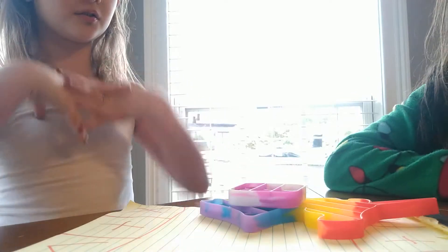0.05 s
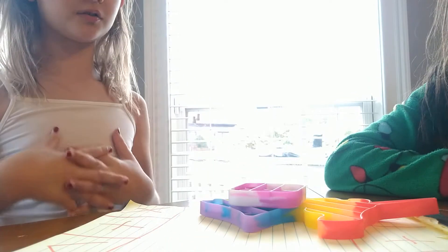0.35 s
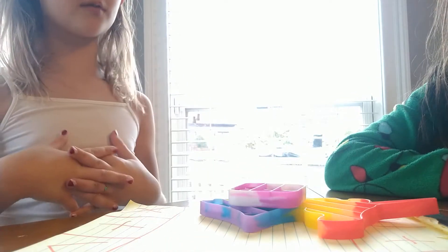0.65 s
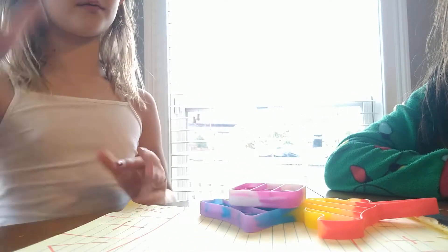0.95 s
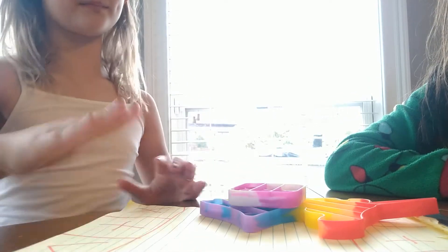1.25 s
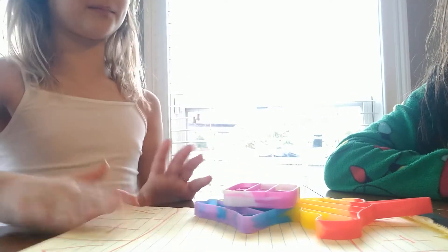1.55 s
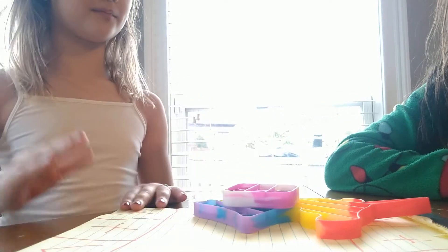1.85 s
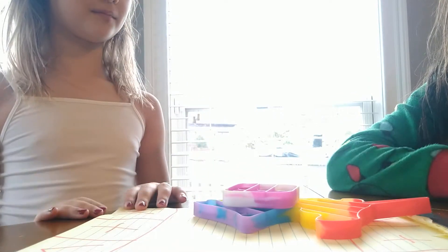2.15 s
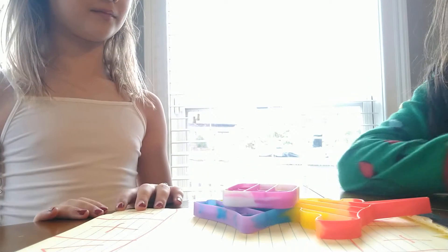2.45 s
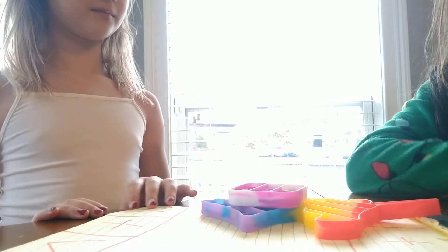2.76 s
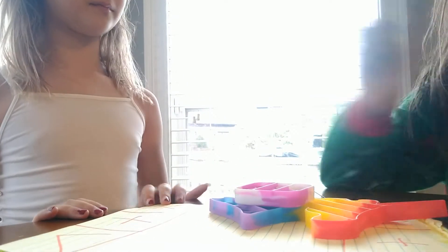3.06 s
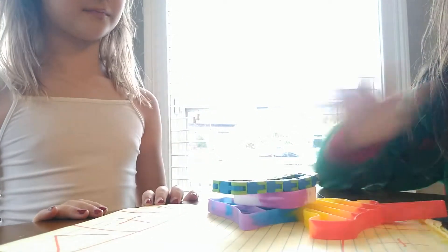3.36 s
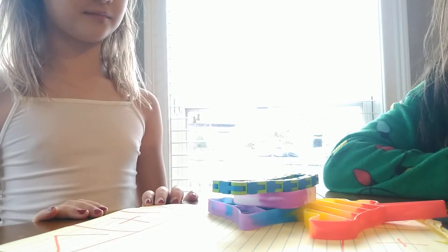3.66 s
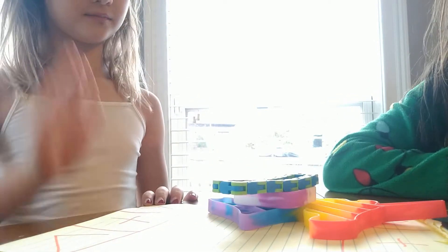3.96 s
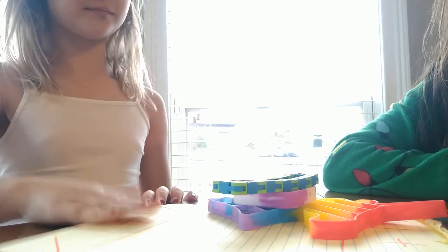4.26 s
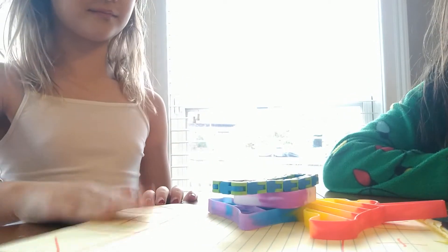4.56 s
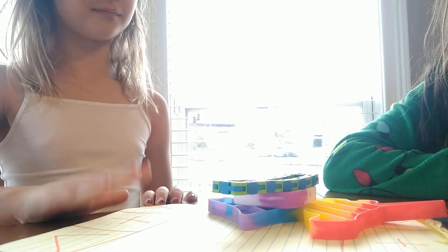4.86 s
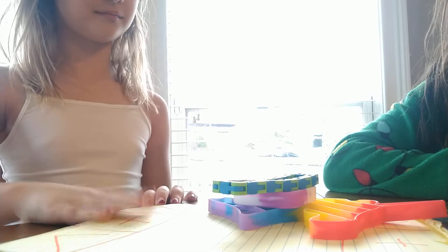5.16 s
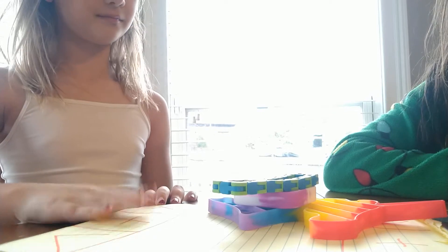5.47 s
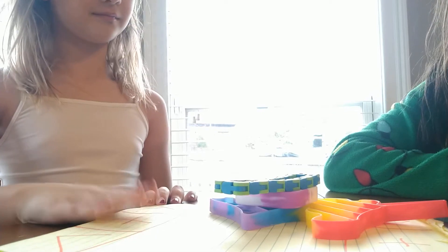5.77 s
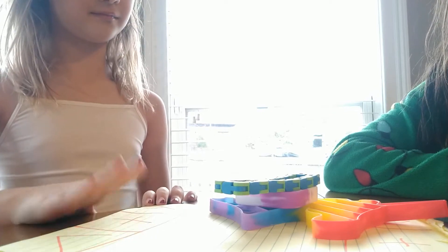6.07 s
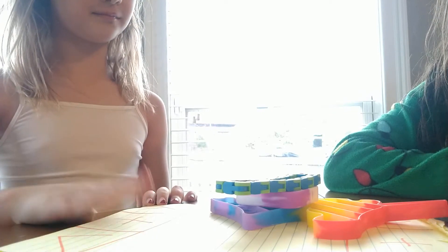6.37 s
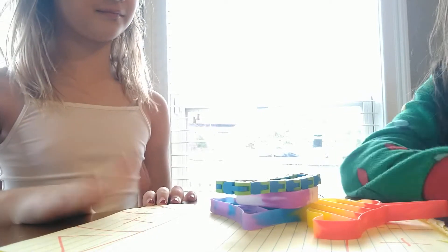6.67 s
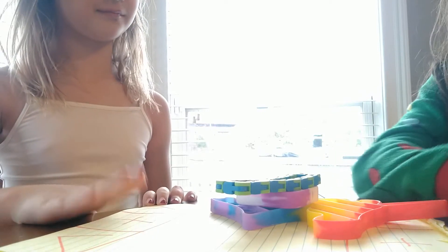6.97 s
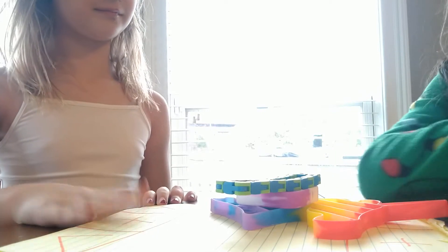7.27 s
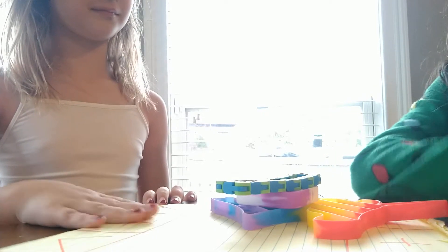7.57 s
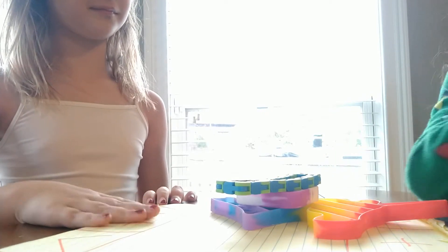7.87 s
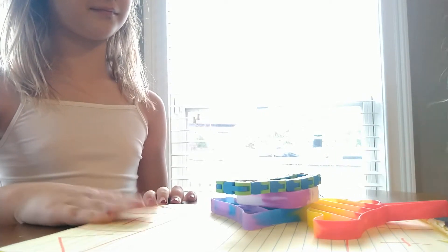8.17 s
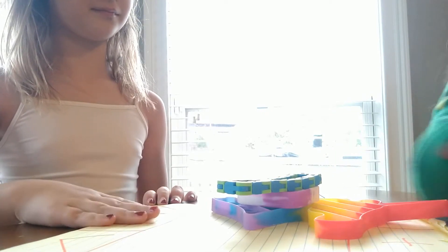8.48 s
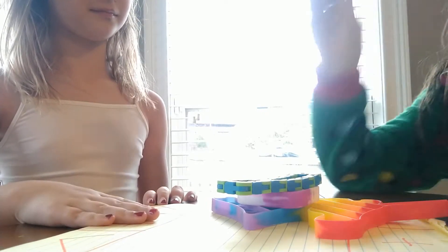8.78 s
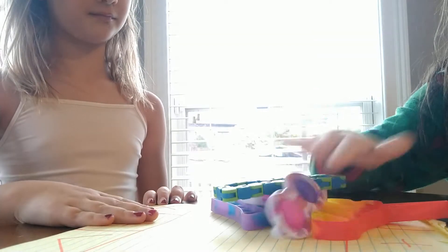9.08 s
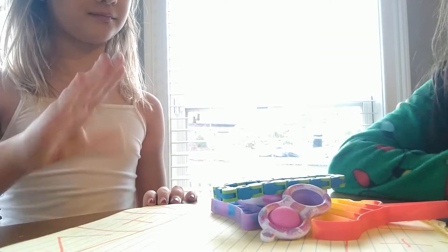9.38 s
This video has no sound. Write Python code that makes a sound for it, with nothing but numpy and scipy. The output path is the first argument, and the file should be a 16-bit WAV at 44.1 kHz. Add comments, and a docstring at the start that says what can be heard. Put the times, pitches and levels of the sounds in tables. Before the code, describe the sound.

In a bare room, a hand slaps a paper pad on a wooden table a few times and gives one hollow clap. Soft arm bumps, faint finger squeaks and toy clicks follow. Another firm slap leads into very light, steady fingertip pats. Then a forearm knocks and skids on the wood, a sleeve rustles, a plastic toy clatters down and a last slap lands. The microphone is close, with a faint appliance hum behind.

```python
"""A hand slaps and taps a paper pad on a wooden table in a bare room, and once claps, cupped, on skin.
Opposite, a second person's forearm bumps and drags, a sleeve rustles, fingers squeak, and silicone
and plastic fidget toys click, scrape and rustle. Impacts are brief force pulses and rubbing is
stick-slip noise; both excite the modes of the table and the reverberation of the room.
An appliance hums. A two-port microphone stands close by on the table."""
import sys
import numpy as np
from scipy import signal
from scipy.fft import rfft, irfft, next_fast_len
from scipy.io import wavfile

SR = 44100
rng = np.random.default_rng(int(sys.argv[2]) if len(sys.argv) > 2 else 0)


def bounce(signal):
    """Save signal as a 16-bit WAV file at the path given by the first command-line argument."""
    frames = np.transpose(np.atleast_2d(signal))
    limited = np.clip(frames, -1, 1)
    pcm = np.round(limited * 32767).astype(np.int16)
    wavfile.write(sys.argv[1], SR, pcm)


N = 424241
TIME = np.arange(N) / SR
TAIL = TIME[:SR * 2 // 3]

# Levels are relative within each table; pan is left minus right.
# appliance hum: t/s, level/dB
HUM_LEVELS = [(0, -71.5), (1.2, -69.5), (2.2, -67.5), (3.8, -69.5), (4.9, -71), (5.8, -71.5), (6.7, -66.5),
              (9.62, -68)]
# spectra of the air and of the low rumble: f/Hz, level/dB
AIR_SPECTRUM = [(100, -41.5), (170, -17.5), (243, -2.5), (329, -14.5), (405, -5.5), (538, -19),
                (614, -8), (770, -19.5), (1230, -20.5), (1440, -24.5), (15500, -33.5)]
RUMBLE_SPECTRUM = [(25, -22.5), (70, -14), (100, -4), (125, 1), (160, -8.5), (220, -13), (400, -41),
                   (2000, -79.5)]
# reverberation time: f/Hz, T60/s
ROOM_DECAY = [(100, .5), (300, 0.46), (800, .5), (2000, 0.4357), (5000, 0.49), (9000, 0.45), (15000, 0.13)]
# reverberant gain: f/Hz, level/dB
ROOM_GAIN = [(100, 0.5), (300, 2), (800, -2.5), (2000, -2), (5000, -9), (9000, -5), (15000, -3.5)]
# modes of the table top: f/Hz, level/dB, T60/s
TABLE_MODES = [(122.5, 2, 0.64), (162, -9.5, 0.24), (230, -4, 0.42), (302, 3, 0.24), (326.7, 1.5, 0.26),
               (473.5, -0.5, 0.35), (602, -1, .25), (665.5, 3, .25), (714, -2.5, 0.51), (839, -3.5, 0.13),
               (996, -1, 0.23), (1086.4, -1, 0.37), (1700, -4, .18), (1900, -3.5, 0.58), (2364, 2, 0.25),
               (2600, 0, 0.14)]
# unequal response of the ports: f/Hz, pan/dB
PORT_RESPONSE = [(100, -.5), (1000, -0.1), (2200, -2), (4500, -2), (8500, 4.5), (13000, 3), (16000, 1)]

# sleeve strokes: t/s, duration/s, level/dB
SLEEVE_STROKES = [(0, 0.079, -73.5), (1.8, 0.75, -77.5), (2.45, 1.26, -74), (6.69, .2, -72.5),
                  (7.08, 0.15, -66.5), (7.4, 0.53, -71.5), (7.81, 0.093, -68), (7.93, 0.081, -64),
                  (8.35, .45, -63), (8.68, 0.068, -46.5), (8.85, 1.1, -75.5)]
# spectrum of brushed fleece: f/Hz, level/dB
CLOTH_SPECTRUM = [(200, -14), (1700, -4), (3000, 1), (4000, 3), (5500, -6), (6100, 1.5), (6900, -7),
                  (7700, -11.5), (8700, -15), (9400, -8), (10200, -18), (15000, -15)]
# resonances of the rustle: f/Hz, bandwidth/Hz, level/dB
RUSTLE_BANDS = [(2970, 450, 1.5), (6300, 440, 1), (8550, 700, 4.5)]
# finger rubs: t/s, duration/s, level/dB
FINGER_STROKES = [(2.45, 0.14, -57.5), (2.57, .09, -55.5), (2.68, 0.085, -62), (2.79, 0.078, -63.5),
                  (2.95, 0.11, -66)]
# resonances of the squeak: f/Hz, bandwidth/Hz, level/dB
SQUEAK_BANDS = [(735, 81, 1.5), (910, 96, -3), (1120, 99, -4), (2970, 290, -5), (6060, 220, -8)]
# toys shifting in a heap: t/s, duration/s, level/dB
RUMMAGE_STROKES = [(7.1, .42, -68.5), (7.91, 0.095, -64), (8.24, 0.33, -57.5), (8.62, 0.23, -54),
                   (9.15, 0.55, -67.5)]
# spectrum of silicone rubbing on plastic: f/Hz, level/dB
SILICONE_SPECTRUM = [(100, -18.5), (400, -1), (900, 0.5), (1500, -1), (3000, -4.5), (4500, -11),
                     (6300, -12), (8500, -2.5), (10300, -21.5), (15500, -21)]
# forearm skids: t/s, duration/s, level/dB
DRAG_STROKES = [(2.17, 0.15, -61), (7.265, 0.094, -42.5), (7.56, .14, -48.5), (8.03, 0.1, -41.5),
                (8.28, 0.067, -46), (8.41, 0.055, -51), (8.7, 0.11, -44), (9.0, .04, -36)]

# impact registers thud, knock, slap and tick: lower f/Hz, upper f/Hz
REGISTER_BANDS = [(80, 350), (350, 1400), (1400, 5000), (5000, 16000)]
# brief clicks, scrapes and rustles of toys: t/s, level/dB, bass/dB, brightness/dB, room/dB, pan/dB
TOY_CONTACTS = [(3.315, -34, -9.5, -11, 1.5, 3), (3.3238, -33, -4, -13.5, -12, -4.5),
                (3.6291, -43, -7.5, -5, -5, 3.5), (7.213, -68, -12, 13.5, -18, 6.5),
                (8.6135, -68, -4, 26.5, -5, 7), (8.7013, -45.5, -8.5, 3, 2.5, 21),
                (8.7349, -43.5, 1.5, 11.5, -12, 11), (8.767, -45, -17.5, 3.5, -9.5, 6),
                (8.782, -39.5, -19, 3, -9, 7.5), (8.9351, -21.5, -24, -18, -1, 7),
                (9.261, -51.5, -14, 4, -8, 7)]
# a hard toy drops on the heap and bounces: t/s, level/dB, bass/dB, brightness/dB, room/dB
DROP_HITS = [(9.0302, -31.5, -11, 12, 4.5), (9.0435, -28.5, -9.5, 5, -6)]
# spectrum of contacts on plastic: f/Hz, level/dB
PLASTIC_SPECTRUM = [(60, -16), (170, 2), (400, -3), (850, 3), (1100, 0.5), (1450, -10.5), (3000, -5.5),
                    (5000, -13.5), (6300, -8.5), (8500, -5), (10300, -15.5), (14000, -16.5), (16000, -15.5)]
# forearm, elbow and knuckles on the table: t/s, level/dB, bass/dB, brightness/dB
ARM_HITS = [(2.1725, -39, -4, -26.5), (2.268, -43.5, -23, -15.5), (2.3231, -50, -16, -20),
            (2.4939, -39, -14.5, -10.5), (2.7312, -47, -24, -26), (2.8323, -54.5, -13, -20),
            (2.9335, -55, -13, -14.5), (3.0594, -38, -14.5, -20.5), (3.1785, -51.5, -27, -4.5),
            (6.151, -49.5, -1, -49), (6.7267, -51, -16.5, -23.5), (6.76, -47, -15, -22.5),
            (7.0352, -53.5, -20, -23), (7.2437, -48, -14, -32), (7.267, -42.5, -16, -15),
            (7.3054, -21, -15.5, -20), (7.3761, -31, -25, -28), (7.4139, -31.5, -19, -25),
            (7.5800, -40.5, -24, -35), (7.992, -41, -12.5, -34), (8.0263, -20, -22.5, -27.5),
            (8.0519, -25, -9, -30), (8.1136, -32, -18, -44), (8.1628, -27.5, -12, -26),
            (8.1785, -31, -21, -26), (8.1841, -29, -23, -29), (8.2526, -38.5, -18, -7.5),
            (8.2925, -34.5, -3.5, -46), (8.4038, -31.5, -10.5, -31), (9.4495, -38.5, -6.5, -11),
            (9.4544, -29.5, -4, -19)]
# spectrum of the arm on wood: f/Hz, level/dB
ARM_SPECTRUM = [(60, -22), (200, -4.5), (450, -2.5), (750, 5), (1100, 2), (1500, -10.5), (2900, -16),
                (4700, -24), (6200, -25.5), (7300, -31.5), (8600, -27.5), (10500, -47.5), (15500, -50)]
# contacts of the clap: t/s, level/dB, bass/dB, brightness/dB, room/dB
CLAP_HITS = [(1.6672, -28.5, -20, -8.5, -6), (1.672, -31.5, -21.5, 3, 1), (1.693, -30.5, -17, -23, -12)]
# spectrum of a cupped hand on skin: f/Hz, level/dB
CUPPED_SPECTRUM = [(60, -25), (300, -12), (700, -3.5), (970, 7.5), (1200, -7.5), (1700, -5.5), (2600, -2),
                   (4000, -16), (6300, -13.5), (9000, -21.5), (10200, -30), (14500, -32), (16000, -35.5)]
# fingertips patting the pad, about four a second: t/s, level/dB
FINGER_PATS = [(4.654, -59.5), (4.7852, -62), (5.1, -66), (5.304, -67.5), (5.539, -66), (5.763, -58.5),
               (6.022, -68), (6.2425, -58), (6.517, -63), (7.1352, -62.5)]
# palm and nails on the pad: t/s, level/dB, bass/dB, brightness/dB, room/dB
HAND_HITS = [(1.2604, -13.5, -14.5, -12.5, 3), (1.425, -28, -8, -17, -3.5), (1.4294, -18, -7, -13, -2.5),
             (1.5318, -22.5, -9, -16, -2), (4.1982, -13.5, -6, -15.5, 1), (4.3543, -28.5, -4, -16.5, -4),
             (4.5152, -51, 4, 12, -5), (5.1625, -68.5, -3, 16, -5), (6.828, -50.5, 1.5, 8, -5.5),
             (9.6069, -10.5, -17.5, -9.5, -3.5)]
# spectrum of the hand on paper: f/Hz, level/dB
PALM_SPECTRUM = [(60, -11), (120, -3.5), (400, -7), (650, 1), (1050, 1), (1450, -12.5), (2800, -4.5),
                 (4500, -15.5), (6300, -15), (8500, -17.5), (10500, -31), (15500, -33.5)]

CONTACT_MS, FIRM_DB, SOFTER_DB = 1.3, -15, 28  # contact time at FIRM_DB; doubles per SOFTER_DB less
PORT_LAG_MS, SIDE_PAN_DB = .48, 4.5  # the lag between the ports grows with pan, then levels off
LEAD_S = .015  # surfaces start to brush this long before they meet


def undb(db):
    """Amplitude ratio of a level in decibels."""
    return 10 ** (np.asarray(db) / 20)


def unit(x):
    """Normalisation to an rms of 1."""
    return x / np.sqrt(np.mean(x ** 2))


def at(points, hz):
    """Interpolation of (f, value) points on a log-frequency axis."""
    f, value = np.transpose(points)
    return np.interp(np.log(np.maximum(hz, 1)), np.log(f), value)


def band(x, lo, hi, order=3):
    """Causal Butterworth band-pass."""
    sos = signal.butter(order, [lo, min(hi, SR / 2 - 1)], "band", fs=SR, output="sos")
    return signal.sosfilt(sos, x)


def colour(x, points, size=2048):
    """Minimum-phase filter with a given (f, level) response, by folding the cepstrum."""
    cepstrum = irfft(np.log(undb(at(points, np.fft.rfftfreq(size, 1 / SR)))))
    cepstrum[1:size // 2] *= 2
    cepstrum[size // 2 + 1:] = 0
    response = irfft(np.exp(rfft(cepstrum)))
    return signal.fftconvolve(x, response[None], axes=1)[:, :x.shape[1]]


def flutter(depth_db, lo, hi, order=2):
    """Random amplitude modulation: a log-normal gain varying at lo to hi Hz."""
    return undb(depth_db * unit(band(rng.standard_normal(N), lo, hi, order)))


def ports(x, lag_ms):
    """Path difference: the left port lags the right by lag_ms."""
    lag = round(lag_ms * SR / 1000)
    return np.array([np.roll(x, lag - lag // 2), np.roll(x, -(lag // 2))])


def diffuse(n, coherent_hz=540):
    """Diffuse field: noise from all sides is coherent at the ports only in the bass."""
    size = next_fast_len(n)
    coherence = .9 / (1 + (np.fft.rfftfreq(size, 1 / SR) / coherent_hz) ** 3)
    mid, side = rfft(rng.standard_normal((2, size)))
    mid, side = mid * np.sqrt(1 + coherence), side * np.sqrt(1 - coherence)
    return irfft(np.array([mid + side, mid - side]), size)[:, :n]


def background(hum_hz=119.2, waver=.36, octave_db=-16, rumble_db=-79, air_db=-73.5):
    """Motor hum and its octave, modulated in phase and amplitude, over diffuse rumble and air."""
    phase_drift, level_drift = unit(band(rng.standard_normal((2, N)), .5, 16, order=1))
    phase = 2 * np.pi * hum_hz * TIME + waver * phase_drift
    tone = np.sin(phase) + undb(octave_db) * np.sin(2 * phase)
    hum = unit(tone * (1 + waver * level_drift))
    hum_db = np.interp(TIME, *np.transpose(HUM_LEVELS))
    rumble = unit(colour(diffuse(N), RUMBLE_SPECTRUM))
    air = colour(diffuse(N), AIR_SPECTRUM)
    air /= np.std(band(air, 180, 15500))
    return hum * undb(hum_db) + rumble * undb(rumble_db) + air * undb(air_db)


def room(build_s=.0028):
    """Reverberation: dense wall echoes build up, then decay exponentially in each third octave."""
    n = len(TAIL)
    spectrum, f = rfft(diffuse(n)), np.fft.rfftfreq(n, 1 / SR)
    onset = 1 - np.exp(-(TAIL / build_s) ** 2)
    edges = 63 * 2 ** (np.arange(25) / 3)
    out = 0
    for lo, hi in zip(edges, edges[1:]):
        hz = np.sqrt(lo * hi)
        decay = 1000 ** (-TAIL / at(ROOM_DECAY, hz))
        echoes = irfft(spectrum * ((f >= lo) & (f < hi)), n) * onset * decay
        out += unit(echoes) * np.sqrt(2 * (hi - lo) / SR / n) * undb(at(ROOM_GAIN, hz))
    return out


def table(ring_db=-17):
    """Modal superposition: the struck table top rings as a sum of damped sinusoids."""
    ring = sum(undb(db) * np.sin(2 * np.pi * hz * TAIL) * 1000 ** (-TAIL / t60)
               for hz, db, t60 in TABLE_MODES)
    return ring / np.linalg.norm(ring) * undb(ring_db)


def strokes(rows, roundness):
    """Amplitude envelope of sliding: each stroke speeds up from rest and slows again."""
    gain = np.zeros(N)
    for start, length, db in rows:
        moving = (TIME > start) & (TIME < start + length)
        arch = np.abs(np.sin(np.pi * (TIME[moving] - start) / length))
        gain[moving] += undb(db) * arch ** roundness
    return gain


def friction(gain, body, lag_ms, slips_per_s, spread_db, smooth, patchy_db, room_db):
    """Stick-slip friction: random slips over a hiss. Gives direct sound and room excitation."""
    slips = (rng.random(N) < slips_per_s / SR) * rng.choice([-1, 1], N)
    slips = slips * undb(spread_db * np.minimum(rng.exponential(size=N), 4))
    grip = flutter(patchy_db, 11, 25.2)
    force = ports(unit(slips), lag_ms) + smooth * diffuse(N)
    sound = unit(colour(force, body) * grip) * gain
    return sound, sound[1] * undb(room_db)


def sleeve(hiss_db=-6, ring_db=-5):
    """Friction of fleece on the table edge: a broadband hiss, with resonances that come and go."""
    gain = strokes(SLEEVE_STROKES, roundness=.47)
    hiss, sent = friction(gain * undb(hiss_db), CLOTH_SPECTRUM, lag_ms=-.45, slips_per_s=1500,
                          spread_db=5.5, smooth=1.4, patchy_db=4.5, room_db=4.5)
    ring = 0
    for hz, width, db in RUSTLE_BANDS:
        wander = flutter(4, 1.5, 8.4)
        resonance = band(diffuse(N), hz - width / 2, hz + width / 2, order=2)
        ring += unit(resonance * wander) * undb(db)
    return hiss + unit(ring) * gain * undb(ring_db), sent


def finger_squeaks(room_db=-6):
    """Stick-slip of skin: narrow resonances flutter independently as the fingers catch and slide."""
    ring = 0
    for hz, width, db in SQUEAK_BANDS:
        grip = flutter(3, 10, 40, order=1)
        resonance = band(diffuse(N), hz - width / 2, hz + width / 2, order=1)
        ring += unit(resonance * grip) * undb(db)
    sound = unit(ring) * strokes(FINGER_STROKES, roundness=.55)
    return sound, sound[1] * undb(room_db)


def toy_rummage():
    """Stick-slip of silicone on plastic: sparse slips as the toys shift in their heap."""
    return friction(strokes(RUMMAGE_STROKES, roundness=.71), SILICONE_SPECTRUM, lag_ms=-.42,
                    slips_per_s=140, spread_db=3.5, smooth=.39, patchy_db=1, room_db=-10)


def arm_drag():
    """Sliding friction: the forearm skids over the wood with an uneven grip."""
    return friction(strokes(DRAG_STROKES, roundness=.54), ARM_SPECTRUM, lag_ms=-.29,
                    slips_per_s=300, spread_db=1.5, smooth=.57, patchy_db=3.5, room_db=-4.5)


def contact(t, level_db, bass_db, bright_db, room_db, pan_db, slap_db):
    """Spectral balance of a contact: brightness lifts the tick register, and the slap half as much."""
    levels = level_db + np.array([bass_db, 0, slap_db + .5 * bright_db, bright_db])
    return t, levels, room_db, pan_db


def transient(levels, pan_db, body, rise_share, snap, scatter_db, scatter_ms, brush=.035, brush_ms=.83):
    """Force pulse, longer for a weaker touch. Gives left, right and room excitation."""
    contact_ms = CONTACT_MS * 2 ** ((FIRM_DB - levels.max()) / SOFTER_DB)
    ms = (np.arange(SR // 12) / SR - LEAD_S) * 1000
    fade_ms = max(contact_ms, .2) * np.where(ms < 0, rise_share, 1)
    envelope = np.exp(-np.abs(ms) / fade_ms) + brush * np.exp(-np.abs(ms) / brush_ms)
    force = rng.standard_normal(len(ms)) * envelope
    force /= np.linalg.norm(force)
    force[np.argmin(np.abs(ms))] += snap / max(contact_ms, 1)  # short contacts snap harder
    # early reflections from bodies and things nearby
    echoes = diffuse(len(ms)) * (ms > .5) * np.exp(-np.abs(ms) / scatter_ms)
    lag_ms = -PORT_LAG_MS * np.tanh(pan_db / SIDE_PAN_DB)
    near = ports(force, lag_ms) + undb(scatter_db) * echoes / np.linalg.norm(echoes[0])
    near *= undb([[pan_db / 2], [-pan_db / 2]])
    # the room gathers all directions, so its share has a more even spectrum
    spectrum = rfft(force)
    radiated = irfft(spectrum / np.sqrt(np.abs(spectrum)), len(ms))
    sound = colour(np.vstack([near, radiated]), body)
    # each register is scaled by its power during the attack
    attack, out = (ms > -3) & (ms < 6), 0
    for (lo, hi), db in zip(REGISTER_BANDS, levels):
        part = band(sound, lo, hi)
        left, right, sent = np.mean(part[:, attack] ** 2, axis=1)
        direct = (left + right) / 2
        out += part * undb(db) / np.sqrt([[direct], [direct], [sent]])
    return out


def transients(contacts, body, direct_db, room_db, **pulse):
    """Superposition of contacts of one kind. Gives direct sound and room excitation."""
    out = np.zeros((3, N))
    for t, levels, send_db, pan_db in contacts:
        gains = undb([[direct_db], [direct_db], [room_db + send_db]])
        sound = gains * transient(levels, pan_db, body, **pulse)
        start = int((t - LEAD_S) * SR)
        out[:, start:start + sound.shape[1]] += sound[:, :N - start]
    return out[:2], out[2]


def toy_handling():
    """Transient excitation: toys click, scrape and rustle briefly when handled; one drops and bounces."""
    handled = [contact(*row, slap_db=4.5) for row in TOY_CONTACTS]
    dropped = [contact(*row, pan_db=0, slap_db=-5) for row in DROP_HITS]
    return transients(handled + dropped, PLASTIC_SPECTRUM, direct_db=-1, room_db=-1,
                      rise_share=.47, snap=1.4, scatter_db=-4.5, scatter_ms=10.4)


def arm_bumps():
    """Impact of forearm, elbow and knuckles on wood: dull knocks with little treble."""
    bumps = [contact(*row, room_db=.2, pan_db=5, slap_db=4) for row in ARM_HITS]
    return transients(bumps, ARM_SPECTRUM, direct_db=-1.5, room_db=-3,
                      rise_share=.52, snap=1, scatter_db=-3.5, scatter_ms=10.4)


def cupped_clap():
    """Impact of a cupped hand on skin, with a hollow resonance near 1 kHz."""
    claps = [contact(*row, pan_db=2, slap_db=1) for row in CLAP_HITS]
    return transients(claps, CUPPED_SPECTRUM, direct_db=-2.5, room_db=-3.5,
                      rise_share=.47, snap=.91, scatter_db=1, scatter_ms=14)


def hand_on_pad(pan_db=-2):
    """Impulsive excitation of the paper pad: short, firm slaps and longer, faint fingertip contacts."""
    slaps = [contact(*row, pan_db, slap_db=2.5) for row in HAND_HITS]
    pats = [contact(*row, bass_db=-1.5, bright_db=-4.5, room_db=-2, pan_db=pan_db, slap_db=2)
            for row in FINGER_PATS]
    return transients(slaps + pats, PALM_SPECTRUM, direct_db=-3, room_db=-2,
                      rise_share=.6, snap=1.1, scatter_db=-5, scatter_ms=9)


def scene():
    """Linear superposition: direct sound, its convolution with room and table, and the background."""
    sources = [hand_on_pad(), cupped_clap(), arm_bumps(), toy_handling(),
               arm_drag(), toy_rummage(), sleeve(), finger_squeaks()]
    direct, sent = (sum(part) for part in zip(*sources))
    ringing = signal.fftconvolve(sent[None], room() + table(), axes=1)[:, :N]
    return direct + ringing + background()


def record(dry, cutoff_hz=15800):
    """Transduction: each port has its own response; the signal is clipped, then low-passed."""
    left = colour(dry[:1], [(hz, db / 2) for hz, db in PORT_RESPONSE])
    right = colour(dry[1:], [(hz, -db / 2) for hz, db in PORT_RESPONSE])
    lowpass = signal.ellip(8, .2, 70, cutoff_hz, fs=SR, output="sos")
    return signal.sosfilt(lowpass, np.clip(np.vstack([left, right]), -1, 1))


dry = scene()
out = record(dry)
bounce(out)
```